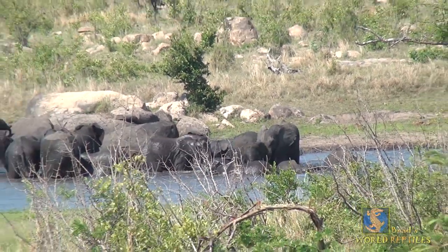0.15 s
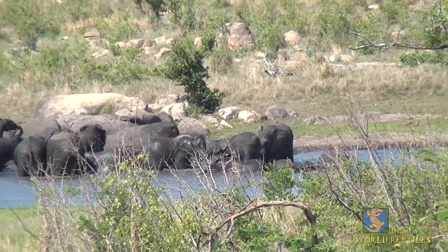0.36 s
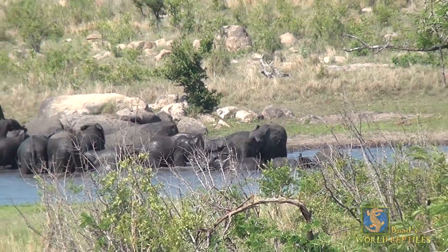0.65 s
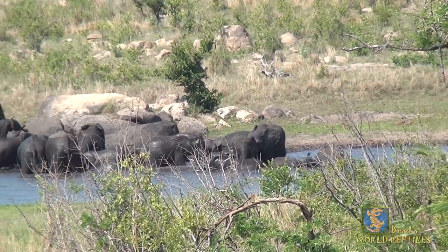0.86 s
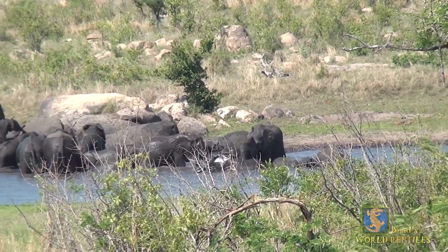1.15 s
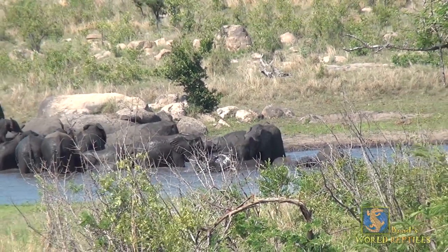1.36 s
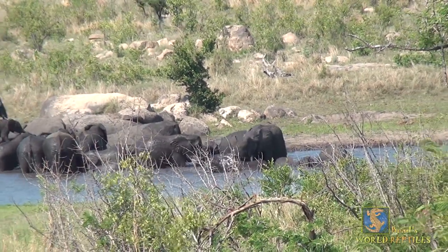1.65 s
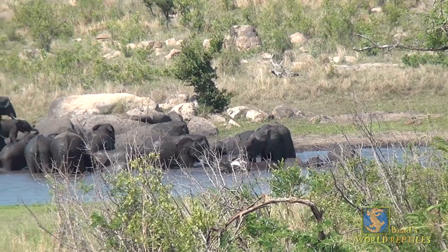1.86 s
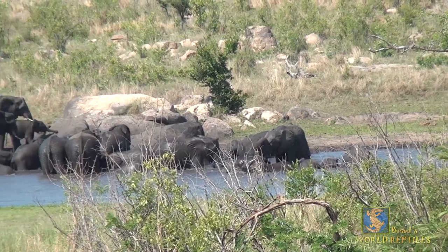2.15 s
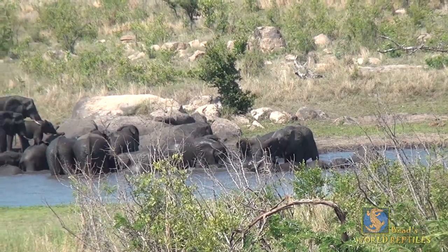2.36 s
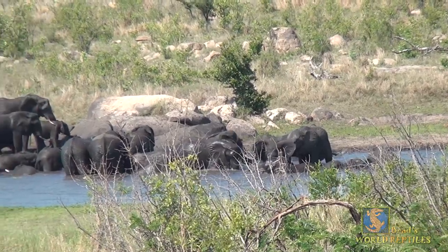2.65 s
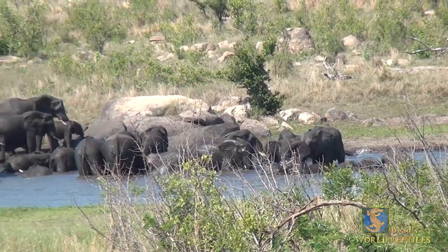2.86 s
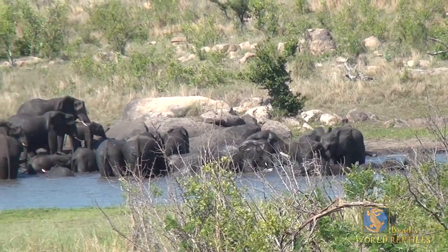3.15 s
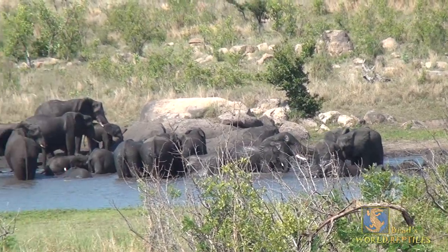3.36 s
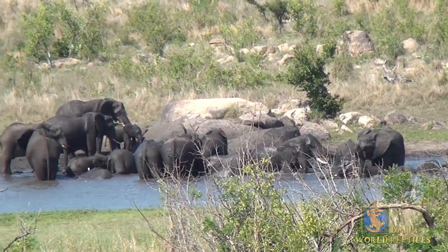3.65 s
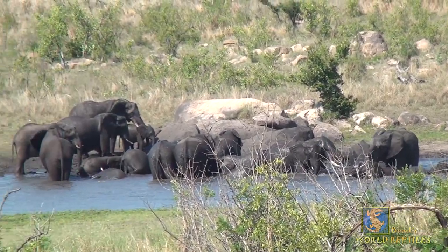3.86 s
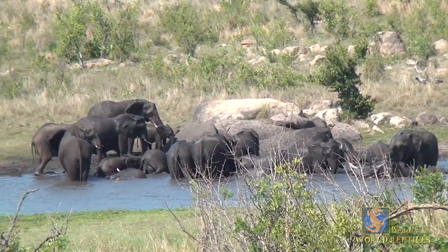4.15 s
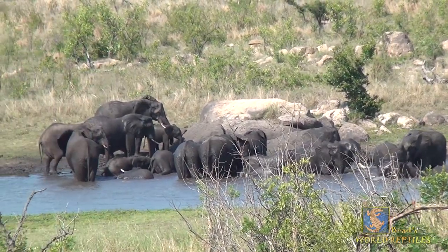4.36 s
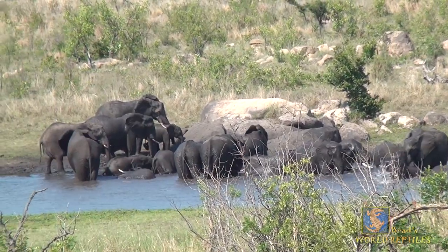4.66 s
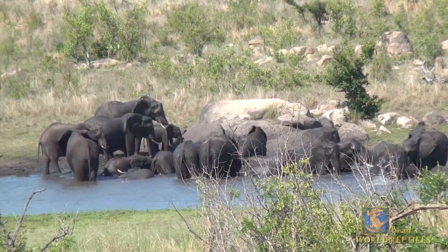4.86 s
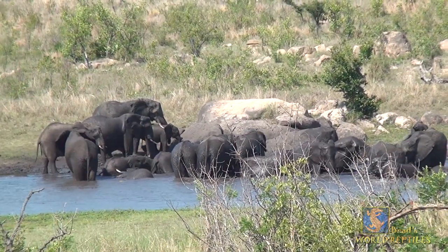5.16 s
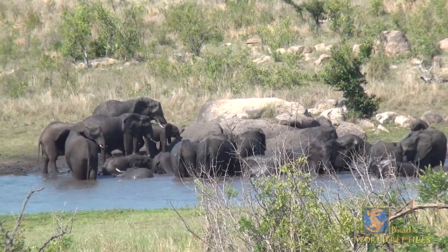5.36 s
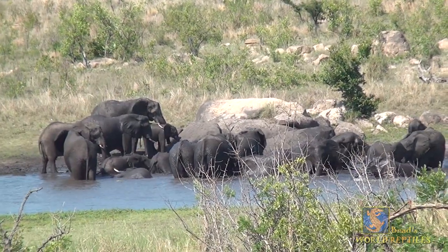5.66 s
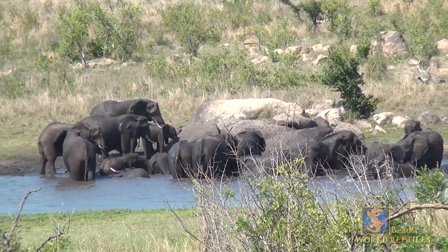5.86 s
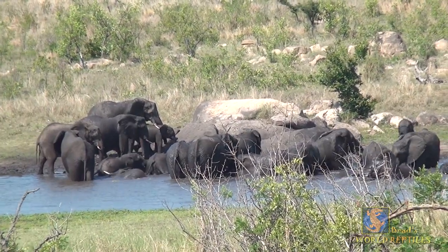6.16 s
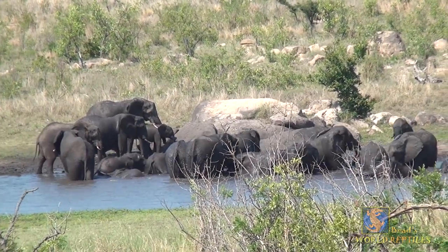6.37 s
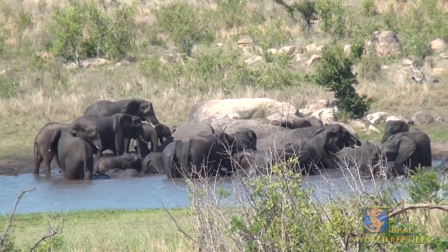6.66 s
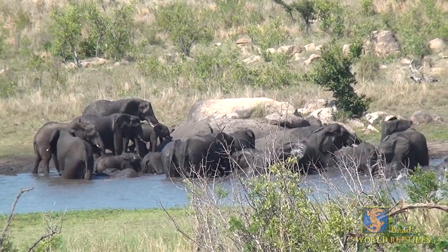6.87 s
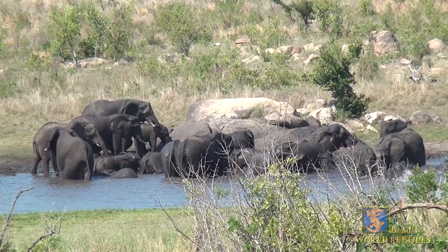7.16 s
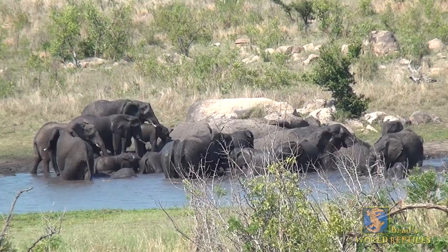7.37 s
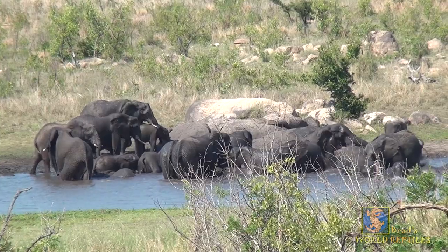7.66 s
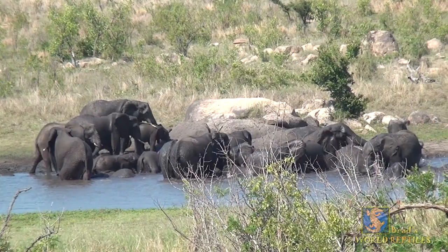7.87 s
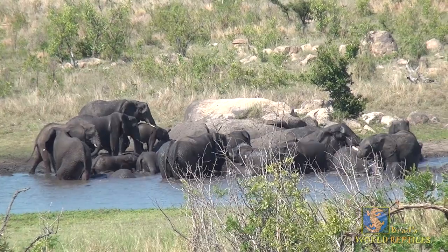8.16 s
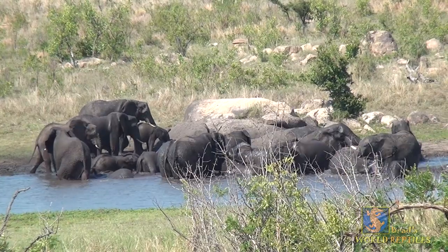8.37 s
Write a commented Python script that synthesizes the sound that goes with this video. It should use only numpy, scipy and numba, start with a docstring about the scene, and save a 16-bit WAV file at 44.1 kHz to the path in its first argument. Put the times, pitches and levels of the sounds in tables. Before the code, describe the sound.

Steady rattling cicada-like drone outdoors, low gusty wind buffeting the microphone, faint regular bird pips and far-off splashing from an elephant herd in a lake.

```python
"""Two kinds of insect sing without pause in a hot bush: click trains summed as harmonic partials, chopped into
strokes, each partial fading as paths through stirred air interfere. Gusts on the microphone are filtered noise,
with single buffets as damped sines. Far off a bird pips on a near-steady beat and others whistle (gliding sines),
a herd bathing in the lake splashes (banded noise with dense drops), dry ticks ring briefly nearby,
and coloured noise gives a distant hiss."""
import sys
import numpy as np
from scipy import signal
from scipy.fft import rfft, irfft, next_fast_len
from scipy.io import wavfile
from scipy.ndimage import uniform_filter1d
from numba import njit

SR = 44100
rng = np.random.default_rng(int(sys.argv[2]) if len(sys.argv) > 2 else 0)


def materialize(psi):
    """Save the field psi as 16-bit PCM at rate SR to the path in sys.argv[1].

    A 1-D psi becomes a single channel; in a 2-D psi each row is a channel.
    """
    bounded = np.clip(np.atleast_2d(psi).T, -1, 1)
    quanta = np.round(bounded * 32767).astype(np.int16)
    wavfile.write(sys.argv[1], SR, quanta)


N = 375732
TIME = np.arange(N) / SR  # s
STEPS = np.arange(0, N + 64, 64) / SR  # moments at which slow chance is drawn, s

# Low singer's song: (time [s], click rate [Hz], lead on a steady beat [strokes])
LOW_SONG = [(0, 629.8, .41), (1.32, 630.4, .98), (1.98, 643.6, -.17), (2.31, 644.7, -.67),
            (3.3, 643.9, -1.58), (4.95, 638.7, -1.67), (5.94, 634.7, -1.27), (6.93, 630.8, -.59),
            (8.52, 629, .22)]
LOW_BEAT_HZ = 71.9
# Low singer's inner partials: (time [s], level of partial 8 [dB], level of partial 9 [dB])
LOW_FADE = [(0.0, -57, -50), (0.09, -63, -66), (0.16, -55.5, -50), (0.73, -60.5, -56.5), (1.9, -56.5, -50),
            (1.95, -65, -57), (2.09, -54, -50), (2.3, -43.5, -51), (2.47, -55.5, -49.5), (2.59, -58, -51),
            (2.65, -47.5, -47), (2.82, -57, -57), (3.06, -46, -43.5), (3.2, -59, -57), (3.28, -57, -51),
            (3.37, -46, -56), (3.51, -53.5, -50), (3.92, -59, -56), (4.03, -51.5, -47),
            (4.93, -57.5, -54.5), (5.01, -51, -49.5), (5.17, -64, -58), (5.41, -58, -54), (5.5, -65, -65),
            (5.84, -65, -51), (5.98, -66, -59), (6.9, -63, -58.5), (7.05, -48, -49), (7.14, -62, -61),
            (7.24, -49.5, -45), (7.43, -62.5, -63), (8.52, -69, -57)]
# Low singer's outer partials: (partial 7 relative to 8 [dB], partial 10 relative to 9 [dB])
LOW_OUTER_DB = (-12, -6)
# Further singers of the low kind: (click rate [Hz], stroke rate [Hz], mean level of partials 8 and 9 [dB])
FAR_SINGERS = [(612, 72, -68), (697, 71.2, -70)]

HIGH_BEAT_HZ = 46.2
# High singer's timing: (time [s], lead on a steady beat [strokes])
HIGH_LEAD = [(0, -0.15), (.6, -0.37), (3.1, -0.3), (3.5, -0.6), (4.4, -0.61), (8.52, -0.97)]
# Rate of its click pairs: (start of stroke [Hz], end of stroke [Hz])
HIGH_CLICK_HZ = (510, 495)
# Its song before the body: (time [s], level near 7 kHz [dB], near 8 kHz [dB], 9 kHz and above [dB])
HIGH_FADE = [(0.0, -54, -49, -52), (0.07, -55, -52.5, -51.5), (1.23, -55, -52.5, -59),
             (1.54, -59.5, -58, -54.5), (1.8, -51, -53.5, -52), (2.32, -64, -58, -60.5),
             (2.4, -52.5, -52, -50.5), (2.8, -52, -45.5, -46), (2.89, -60, -55, -55),
             (3.06, -54, -48.5, -56.5), (3.37, -69, -58.5, -61), (3.92, -52, -58, -60),
             (3.98, -58, -54, -48), (4.1, -61, -60, -58.5), (4.51, -54, -49.5, -49),
             (4.79, -59, -55.5, -61.5), (4.91, -55, -45.5, -44), (5.13, -47.5, -55, -58),
             (5.62, -73, -61, -60), (6.45, -63, -55.5, -57.5), (6.71, -50, -49, -45),
             (6.93, -56, -53.5, -54), (7.14, -54, -46.5, -54), (7.45, -63.5, -65, -53.5),
             (8.31, -54, -54.5, -60), (8.52, -74, -58, -59)]
# Its partials: (multiple of the pair rate [1], index of the fade it follows [1])
HIGH_PARTIALS = [(13, 0), (14, 0), (15, 0), (16, 1), (17, 1), (18, 2), (19, 2), (20, 2), (21, 2), (22, 2),
                 (23, 2), (24, 2), (25, 2)]
# What its body lets out of each partial: (gain [dB])
HIGH_BODY_DB = [-4, 1, -0.5, 2.8, 0.5, 3, -3, -9, -11, -18, -14.5, -25, -30]

# Rising and falling breeze on the microphone: (time [s], rumble level [dB])
WIND = [(0, -51), (1.3, -40), (1.58, -54), (2.3, -42.5), (3.1, -43.5), (4.8, -38), (5.3, -52), (5.9, -50.5),
        (7.2, -64), (7.5, -44), (8.52, -47)]
# Gusts that override the breeze: (start [s], length [s], rumble level at the start [dB])
GUSTS = [(0.098, 0.086, -43.5), (0.464, 0.076, -39), (0.774, 0.3, -35.5), (1.099, 0.097, -32.5),
         (1.246, 0.16, -43.5), (1.666, 0.3, -40.5), (1.993, 0.12, -41), (2.256, 0.056, -36.5),
         (2.43, 0.065, -37), (2.633, 0.23, -30), (2.827, .11, -28), (3.002, 0.059, -29),
         (3.09, 0.093, -29.5), (3.244, 0.12, -29.5), (3.447, .04, -36.5), (3.523, 0.046, -32.5),
         (3.65, .07, -35), (3.747, 0.15, -35), (3.982, 0.21, -32.5), (4.31, .13, -35.5), (4.541, .13, -35),
         (4.708, 0.18, -33), (5.049, 0.183, -37), (5.278, .14, -45), (5.628, 0.071, -44.5),
         (6.095, 0.032, -40.5), (6.264, 0.22, -47.5), (7.297, 0.056, -41), (7.367, 0.032, -35.5),
         (7.47, 0.025, -30.5), (7.517, 0.099, -33), (7.666, 0.12, -33), (7.84, 0.17, -42),
         (8.16, 0.062, -40), (8.336, 0.16, -38.5)]
# slopes before the start, from the start on, and after the end
GUST_RISE_DB_S, GUST_SAG_DB_S, GUST_FALL_DB_S = 550, 4, 350
# Bathing herd: (time [s], slosh level [dB], spray level before a 0.5 dB lift [dB])
WATER = [(0.0, -69, -65), (0.04, -68.5, -75), (1.26, -72, -64), (2.44, -72, -66), (2.59, -70, -60),
         (2.75, -61, -65.5), (3.2, -68, -65), (3.49, -53.5, -51.5), (3.65, -50, -53), (3.96, -60.5, -64),
         (4.08, -50.5, -62), (4.51, -57, -67), (5.03, -58.5, -59), (5.74, -62.5, -67), (6.14, -59.5, -60),
         (6.86, -62.5, -66.5), (8.52, -61.5, -65.5)]
# Spectrum of the hiss and far insects: (frequency [Hz], gain relative to BUSH_DB [dB])
BUSH = [(20, -20), (40, -4.5), (70, -5.5), (120, -14.5), (300, -12), (600, -20), (2500, -25.5), (3900, -26),
        (5200, -19), (8300, -13.3), (9500, -18), (10800, -27), (13000, -34.5), (16000, -35.5)]
BUSH_DB = -31.5
# Bird pips: (start [s], peak level [dB])
PIPS = [(0.0608, -58), (0.3686, -54), (0.6809, -60), (0.9966, -60), (1.2905, -60), (1.896, -53.5),
        (2.2039, -61), (2.491, -55), (3.1193, -56), (4.0382, -60), (4.345, -58), (4.6568, -49.5),
        (4.9696, -49.5), (5.2824, -53), (5.582, -53.5), (5.8845, -59), (6.4991, -53), (6.7895, -49),
        (7.0903, -56), (7.39, -49.5), (7.6819, -58)]
# Pitch the pips settle towards, sagging and recovering: (time [s], frequency [Hz])
PIP_PITCH = [(0, 2880), (3.1, 2735), (5.6, 2715), (7.1, 2785), (7.7, 2810)]
# Whistles: (start [s], length [s], first frequency [Hz], last frequency [Hz], peak level [dB])
WHISTLES = [(.5, 0.085, 4930, 4800, -54), (.53, 0.057, 3440, 3440, -66), (1.59, .07, 3950, 3620, -74),
            (2.085, 0.12, 3760, 3420, -67), (2.42, .04, 5000, 4400, -64), (3.134, 0.029, 4260, 4950, -59),
            (0.137, 0.044, 3970, 4900, -67), (0.45, 0.036, 4350, 4930, -63), (1.05, 0.026, 4200, 5000, -67),
            (2.48, 0.16, 3900, 3380, -63), (2.61, 0.082, 4300, 4900, -61), (2.773, 0.068, 4060, 3850, -65),
            (2.845, 0.022, 4800, 4100, -57), (2.964, 0.084, 3800, 3300, -64),
            (5.818, 0.029, 4300, 5070, -52.5), (6.406, 0.043, 3350, 2960, -59),
            (6.536, 0.059, 3500, 4180, -54.5)]
# Dry ticks nearby: (start [s], level the decay starts from [dB], centre frequency [Hz])
TICKS = [(.805, -41, 3600), (1.74, -52, 3000), (1.88, -51, 3000), (2.036, -46, 13500), (2.1, -51, 2500),
         (2.415, -39, 13500), (2.913, -46, 13500), (3.757, -45, 13500), (4.086, -42, 2900),
         (4.09, -43, 1400), (4.986, -43, 3400), (5.137, -45, 1450), (7.128, -49, 2500), (7.535, -39, 3800)]
# Sharp single buffets: (start [s], level at the top of the envelope [dB], frequency [Hz])
BUFFETS = [(1.15, -19, 150), (1.672, -31, 220), (2.676, -18, 170), (3.002, -15, 150), (3.275, -17, 190),
           (3.34, -23, 190), (4.744, -20, 240), (5.075, -25, 190), (7.478, -24, 170), (7.583, -20, 170),
           (7.669, -29, 190), (7.702, -21, 180)]
TOP_HZ = 15750  # edge of the final low-pass


def undb(db):
    """Decibel law: amplitude gain of a level in dB."""
    return 10 ** (np.asarray(db) / 20)


def unit(x):
    """Power normalisation: scaled to rms 1."""
    return x / np.sqrt(np.mean(x ** 2))


def curves(table):
    """Linear interpolation: every column after the first, read at each sample."""
    s, *columns = np.transpose(table)
    return [np.interp(TIME, s, column) for column in columns]


def drift(rate):
    """Smoothed random levels: each held about 1 / rate s, averaged twice, spread near 1, at the coarse steps."""
    k = int(SR / 64 / rate)
    held = np.repeat(rng.standard_normal(len(STEPS) // k + 1), k)[:len(STEPS)]
    return 1.3 * uniform_filter1d(uniform_filter1d(held, k), k)


def walk(rate):
    """Slow random modulation: a drift read at each sample."""
    return np.interp(TIME, STEPS, drift(rate))


def air(scatter, rate):
    """Multipath interference: where straight and scattered paths cancel, a partial drops out briefly."""
    in_phase = 1 + scatter * drift(rate)
    quadrature = scatter * drift(rate)
    strength = np.hypot(in_phase, quadrature) / np.sqrt(1 + 2 * scatter ** 2)
    return np.interp(TIME, STEPS, strength)


def band(x, lo_hz, hi_hz, order=2):
    """Band-pass filtering with a maximally flat (Butterworth) response."""
    return signal.sosfilt(signal.butter(order, [lo_hz, hi_hz], "bandpass", fs=SR, output="sos"), x)


@njit
def lowpass(x, hz, damping):
    """State-variable filtering: a second-order low-pass whose corner moves every sample."""
    y, b, l = np.empty(len(x)), 0., 0.
    for i in range(len(x)):
        g = np.tan(np.pi * hz[i] / SR)
        v = (b + g * (x[i] - l)) / (1 + g * (g + damping))
        y[i] = l + g * v
        b, l = 2 * v - b, 2 * y[i] - l
    return y


def add(out, s, sound):
    """Superposition: mixes a sound in from time s."""
    i = int(s * SR)
    out[i:i + len(sound)] += sound[:N - i]


def low_singer(click_hz, strokes, inner_db, scatter, arch=.9, twist_turns=.44, drift_rate=19):
    """Harmonic series of a click train: partials 7 to 10, amplitude-modulated into arched strokes."""
    clicks = np.cumsum(click_hz) / SR
    stroke = (strokes + .5) % 1
    swell = np.sqrt(2) * unit(np.sin(np.pi * stroke) ** arch)
    eighth, ninth = undb(inner_db)
    gains = undb(LOW_OUTER_DB[0]) * eighth, eighth, ninth, undb(LOW_OUTER_DB[1]) * ninth
    song = np.zeros(N)
    for k, gain in enumerate(gains, start=7):
        # every stroke gains part of a turn and loses it in the gap, splitting each partial into a pair of lines
        turns = k * clicks + twist_turns * stroke + rng.random()
        song += gain * air(scatter, drift_rate) * np.cos(2 * np.pi * turns)
    return swell * song


def far_singers(waver=.003, fade_db=2.5, scatter=1.2):
    """Scattered propagation: the low song from further bushes, each wavering in pitch, mostly by indirect paths."""
    out = np.zeros(N)
    for hz, stroke_hz, db in FAR_SINGERS:
        click_hz = hz * (1 + waver * walk(0.98))
        song = low_singer(click_hz, stroke_hz * TIME, (db, db), scatter)
        out += undb(fade_db * walk(2.27)) * song
    return out


def high_singer(duty=.86, edge=.14, even_at=.3, scatter=.5, drift_rate=14, gusty_db=2):
    """Harmonic series of slowing click pairs: uneven pairs, early and late in a stroke, wake the odd partials."""
    strokes = HIGH_BEAT_HZ * TIME + curves(HIGH_LEAD)[0] + duty / 2
    part = strokes % 1 / duty  # above 1 in the gap
    swell = unit(np.clip(np.minimum(part, 1 - part) / edge, 0, 1))
    first, last = HIGH_CLICK_HZ
    # the rate lingers at both ends of its fall
    mean_turns = (first + last) / 2 * part
    fall_turns = (first - last) / 2 * np.sin(np.pi * part) / np.pi
    pairs = duty / HIGH_BEAT_HZ * (mean_turns + fall_turns)
    # no stroke starts on quite the same click
    pairs = pairs + .005 * rng.standard_normal(int(strokes[-1]) + 1)[strokes.astype(int)]
    fades = undb(curves(HIGH_FADE) + gusty_db * walk(12))
    song = np.zeros(N)
    for (k, fade), body_db in zip(HIGH_PARTIALS, HIGH_BODY_DB):
        # odd partials vanish where the pairs are even
        unevenness = 2 * (part - even_at) if k % 2 else 1
        partial = np.cos(2 * np.pi * (k * pairs + rng.random()))
        song += undb(body_db) * fades[fade] * air(scatter, drift_rate) * unevenness * partial
    return swell * song


def push():
    """Wind pressure as a level in dB: the breeze, or the gust that exceeds it."""
    gusts = []
    for s, length, db in GUSTS:
        rise = GUST_RISE_DB_S * (s - TIME)
        sag = GUST_SAG_DB_S * (TIME - s)
        fall = GUST_FALL_DB_S * (TIME - s - length)
        gusts.append(db - np.maximum.reduce([rise, sag, fall]))
    return np.maximum(curves(WIND)[0], np.max(gusts, axis=0))


def wind(flutter_db=1.5, puff_db=1.5, corner_hz=175, sharpen=0.45):
    """Turbulent pressure on the capsule: the stronger the push, the smaller and sharper the eddies."""
    push_db = push() + puff_db * walk(24) + flutter_db * walk(55)
    # corner_hz holds at a push of -29 dB
    corner = np.clip(corner_hz * undb(sharpen * (push_db + 29)), 40, 600)
    eddies = lowpass(rng.standard_normal(N), corner, 1.4)
    eddies = lowpass(eddies, 1.48 * corner, 4.6) / np.sqrt(corner)
    # the bass cut leaves a hump just above it
    return undb(push_db) * unit(band(eddies, 58, 2000, order=3))


def water(drops_per_s=250, spread_db=12):
    """Shot noise: dense random drops in a wash blurred by distance, in a dull and a brighter band."""
    slosh_db, spray_db = curves(WATER)
    falls = rng.random((2, N)) < drops_per_s / SR
    drops = falls * rng.standard_normal((2, N)) * undb(spread_db * rng.random((2, N)))
    wash = rng.standard_normal((2, N)) + 5 * drops
    slosh = undb(slosh_db + 1.1 * walk(20)) * unit(band(wash[0], 417, 1250))
    spray = undb(spray_db + 0.5 + 1.12 * walk(14)) * unit(band(wash[1], 1260, 3070))
    return slosh + spray


def bush(flicker_db=1.1):
    """Spectral shaping of noise: a smooth hiss whose treble, far insects in the same moving air, flickers."""
    hz, db = np.transpose(BUSH)
    size = next_fast_len(N)
    bins = np.arange(size // 2 + 1) * SR / size + 1  # Hz, kept above zero for the logarithm
    gain = undb(BUSH_DB + np.interp(np.log(bins), np.log(hz), db))
    colour = gain * rfft(rng.standard_normal(size))
    treble = np.clip(np.minimum(bins / 2000 - 2, 6 - bins / 2000), 0, 1)  # 4 to 12 kHz, full from 6 to 10
    rest = irfft(colour * (1 - treble), size)[:N]
    return rest + undb(flicker_db * walk(8.9)) * irfft(colour * treble, size)[:N]


def pips(pip_s=0.035, pip_drop=0.058):
    """Frequency modulation: each short tone starts sharp by pip_drop and settles exponentially towards its pitch."""
    out = np.zeros(N)
    u = np.arange(int(pip_s * SR)) / (pip_s * SR)
    for s, db in PIPS:
        pitch = np.interp(s, *np.transpose(PIP_PITCH))
        hz = pitch * (1 + pip_drop * np.exp(-u / 0.083))
        swell = np.sin(np.pi * u ** 0.31)  # peaks early
        add(out, s, undb(db) * swell * np.sin(2 * np.pi * np.cumsum(hz) / SR))
    return out


def whistles():
    """Linear frequency sweep: a pure tone glides from its first to its last pitch."""
    out = np.zeros(N)
    for s, length, first_hz, last_hz, db in WHISTLES:
        u = np.arange(int(length * SR)) / (length * SR)
        hz = first_hz + (last_hz - first_hz) * u
        swell = np.sin(np.pi * u) ** 0.19
        add(out, s, undb(db) * swell * np.sin(2 * np.pi * np.cumsum(hz) / SR))
    return out


def ticks(cycles=3.5):
    """Damped free vibration: each tick falls to 1/e in a few cycles."""
    out, u = np.zeros(N), np.arange(600) / SR
    for s, db, hz in TICKS:
        add(out, s, undb(db) * np.sin(2 * np.pi * hz * u) * np.exp(-u * hz / cycles))
    return out


def buffets():
    """Pressure pulse on the capsule: a sine under a Gaussian envelope about a cycle wide."""
    out = np.zeros(N)
    u = (np.arange(1200) - 300) / SR  # the envelope tops 300 samples after the start
    for s, db, hz in BUFFETS:
        envelope = np.exp(-(u * hz / .5) ** 2)
        add(out, s, undb(db) * envelope * np.sin(2 * np.pi * hz * u + 1))
    return out


def scene():
    """Linear superposition of all sources at one microphone."""
    click_hz, lead = curves(LOW_SONG)
    near = low_singer(click_hz, LOW_BEAT_HZ * TIME + lead, curves(LOW_FADE), scatter=0.5)
    insects = near + far_singers() + high_singer()
    surroundings = wind() + water() + bush()
    events = pips() + whistles() + ticks() + buffets()
    return (insects + surroundings + events)[None]


def record(dry):
    """Band limiting: a steep elliptic low-pass removes the top."""
    return signal.sosfilt(signal.ellip(10, .2, 80, TOP_HZ, fs=SR, output="sos"), dry)


dry = scene()
out = record(dry)
materialize(out)
```